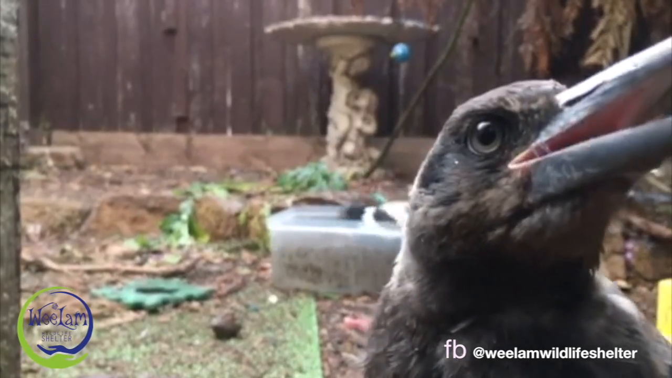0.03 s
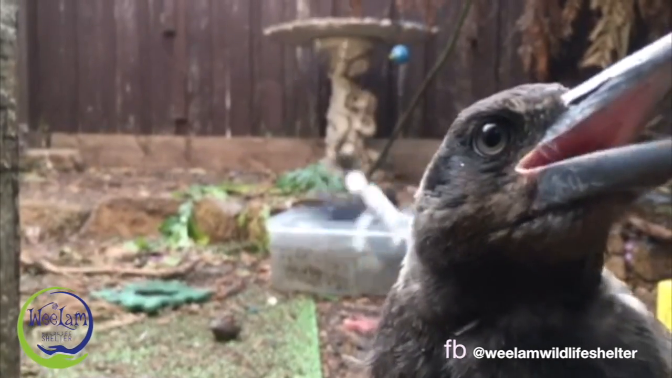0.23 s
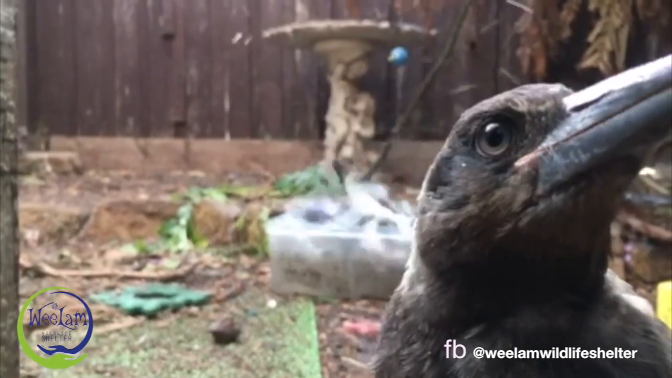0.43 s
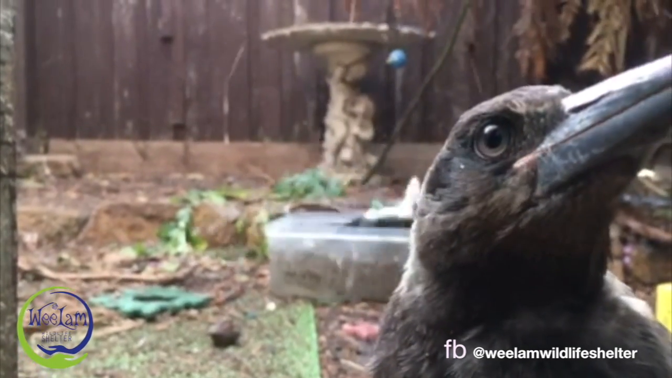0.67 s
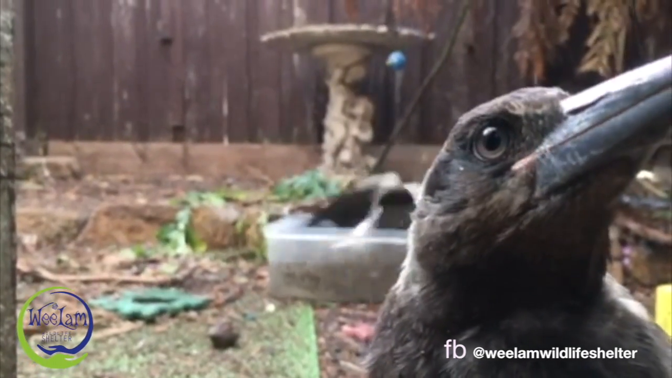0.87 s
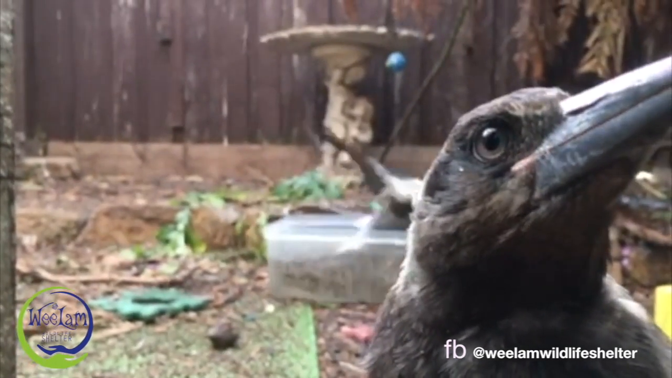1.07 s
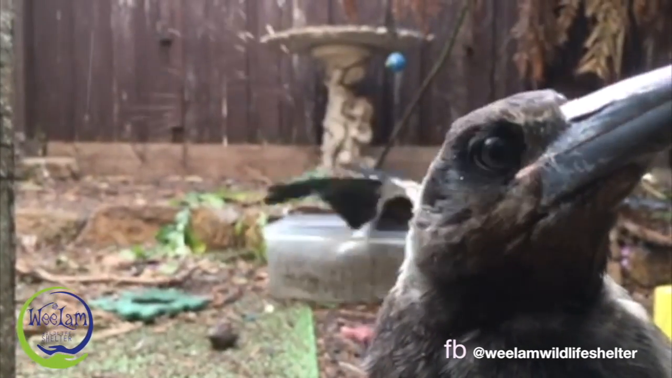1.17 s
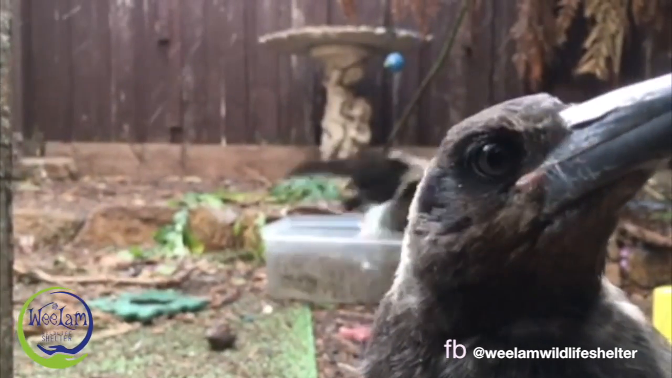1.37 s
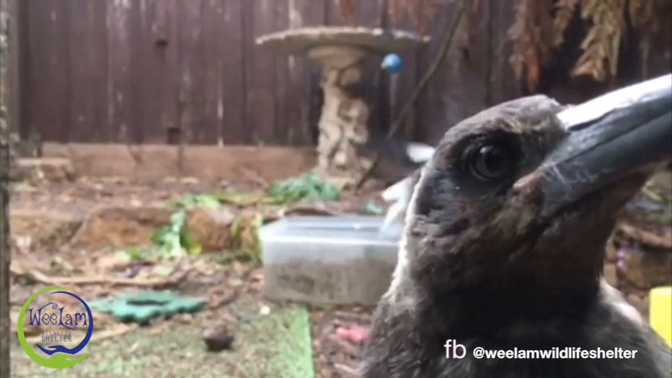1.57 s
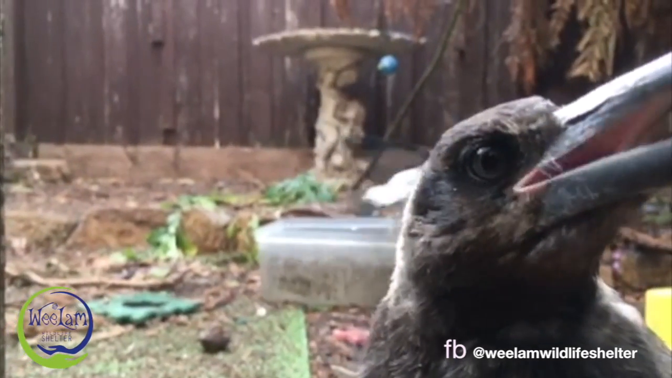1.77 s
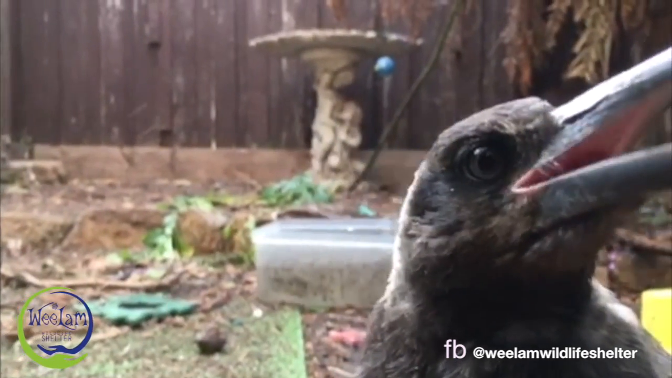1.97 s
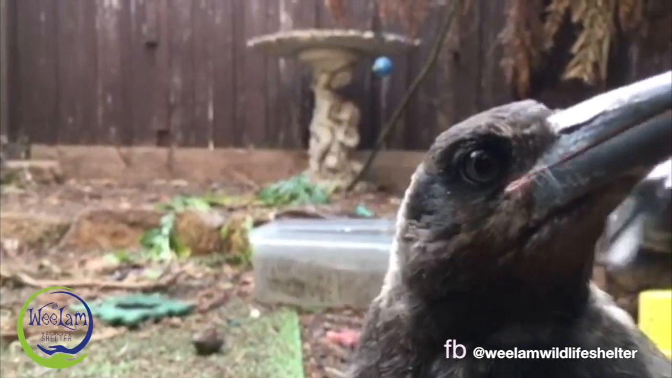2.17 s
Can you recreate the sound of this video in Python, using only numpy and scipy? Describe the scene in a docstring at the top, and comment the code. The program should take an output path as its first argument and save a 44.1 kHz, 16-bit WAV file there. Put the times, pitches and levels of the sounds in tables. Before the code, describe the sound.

Young magpie squawks close up, one clear and one raspy, while a bird splashes in a tub

```python
"""A garden with a plastic tub: a young magpie at the microphone gives a clear, arching squawk, then a lower, rasping
one that clears as it ends. Syrinx pulses ring its throat; noise bursts make its beak clicks, and soft tones low bumps.
Behind it a bird bathes: noise-burst wing slaps, rising bubble tones, spray of tiny ringing drops over mist.
Far birds whistle as wavering sines over shaped-noise rumble and air; the fence answers with a decaying noise tail."""
import sys
import numpy as np
from scipy import signal
from scipy.fft import rfft, irfft, next_fast_len
from scipy.io import wavfile
from scipy.ndimage import map_coordinates

SR = 44100
rng = np.random.default_rng(int(sys.argv[2]) if len(sys.argv) > 2 else 0)


def dump_mix(stems):
    """Bounce the given channels to the path in sys.argv[1] as a 16-bit WAV at rate SR."""
    frames = np.atleast_2d(stems).T  # one column per channel
    limited = np.clip(frames, -1, 1)  # hard clip at full scale
    pcm = np.round(limited * 32767).astype(np.int16)
    wavfile.write(sys.argv[1], SR, pcm)


N = 99225
TOP_HZ = 16000

# Spectra of outdoor rumble and air. Each row: frequency in Hz, relative level in dB.
RUMBLE_SPECTRUM = [(31, -30), (47, 0.5), (62, -12), (160, -21), (9000, -87.5)]
AIR_SPECTRUM = [(400, 0), (1200, -4), (2500, -12.5), (5000, -14), (15500, -24)]
RUMBLE_DB, AIR_DB = -52.5, -69

# Decay of the garden echo. Each row: frequency in Hz, time to -60 dB in seconds.
GARDEN_DECAY = [(2500, 0.56), (15000, .25)]
CALL_ECHO_DB, NEAR_ECHO_DB, FAR_ECHO_DB = -40, -14.5, -9.5
BEAM_HZ = 9000  # the echo send of the calls is doubled here

# Far whistles. Each row: start in seconds, length in seconds, start pitch in Hz, end pitch in Hz,
# level in dB before flicker and far mix.
WHISTLES = [(.115, 0.058, 3760, 3870, -52), (.745, .075, 3780, 3830, -53), (1.35, 0.19, 2196, 3040, -61.5),
            (1.405, .15, 3770, 3462, -58), (1.538, 0.0602, 2647, 2717, -52.5),
            (1.62, 0.228, 2665, 2787, -63)]
WHISTLE_WAVER, OCTAVE_DB = .017, -14  # waver as a fraction of pitch

# Spray envelope. Each row: time in seconds, level in dB before the drop and mist gains.
SPRAY_LEVEL = [(.425, -69), (0.464, -54), (.6, -54.5), (.66, -59), (.73, -52.5), (.82, -64.5), (.96, -61),
               (1.09, -75.5), (1.18, -62), (1.28, -84), (1.6, -77.5), (1.64, -62), (1.83, -80)]
# Mist spectrum. Each row: frequency in Hz, relative level in dB.
MIST_SPECTRUM = [(200, -12), (700, -0.5), (5500, -3.5), (15500, -12)]
DROPS_PER_S, DROP_MEDIAN_HZ, DROP_CYCLES = 850, 2697, 27  # cycles to -60 dB
DROP_SPREAD_DB = 4.6  # per unit of an exponential draw
DROPS_DB, MIST_DB = -1, -5.5

# Wing slaps on water. Each row: start in seconds, level in dB before the attack, time to -60 dB in seconds.
SLAPS = [(.433, -48.5, 0.03), (.471, -44, 0.12), (.523, -36, 0.08), (.579, -43.5, 0.11),
         (.695, -45.5, 0.02), (.727, -45, 0.03), (.905, -45, 0.09), (1.134, -52, 0.1), (1.214, -36, 0.0834)]
# Tub spectrum. Each row: frequency in Hz, relative level in dB.
TUB_SPECTRUM = [(200, -5), (400, -6), (600, 2.5), (950, 0.5), (1750, -6.5), (2300, -19.5), (16000, -39)]
# Bubbles in the tub. Each row: start in seconds, start pitch in Hz, level in dB before the envelope.
BUBBLES = [(.528, 600, -41), (.906, 640, -45), (1.44, 947, -50.5), (1.724, 3130, -47.5)]
BUBBLE_CYCLES, BUBBLE_RISE_PER_S = 57, 3  # cycles to -60 dB; rise as a fraction of start pitch

# Beak clicks. Each row: start in seconds, level in dB before the attack, time to -60 dB in seconds.
CLICKS = [(.695, -42.5, 0.05), (1.628, -26.5, 0.01), (1.6298, -31, 0.017), (2.088, -56, 0.07),
          (2.113, -48, .007)]
# Beak spectrum. Each row: frequency in Hz, relative level in dB.
BEAK_SPECTRUM = [(400, -13), (1800, -0.5), (3200, -10.5), (5800, 3.5), (7300, -10.5), (8800, -0.5),
                 (16000, -13)]
# Soft low bumps. Each row: start in seconds, pitch in Hz, level in dB before the envelope.
BUMPS = [(1.613, 261, -35), (1.615, 523, -41.5), (1.768, 429, -44.5)]
BUMP_CYCLES = 19.6  # to -60 dB

# Clear and rasping squawks. Each row: time in seconds, pitch in Hz, level of the low partials in dB,
# of the middle ones in dB, of the treble in dB, roughness from 0 to 1.
CLEAR_SQUAWK = [(.198, 1207, -55, -73.5, -85, 0.8), (.205, 1226, -33, -42, -59, 0.7),
                (.208, 1222, -20, -23, -32, 0.48), (.22, 1259, -17, -19.5, -27, 0.34),
                (.227, 1287, -18.5, -15.5, -25.5, 0.16), (.254, 1274, -23, -15, -33, 0.06),
                (.273, 1221, -27, -28.5, -56, .2), (.304, 1192, -32, -39, -65, .3),
                (.318, 1132, -41.5, -62.5, -72, .7), (.335, 1029, -58, -79, -85, 1)]
RASPING_SQUAWK = [(1.906, 798, -58, -84, -97.5, .3), (1.9105, 833, -30, -37.5, -42, .5),
                  (1.917, 823.3, -36, -44, -49, 0.99), (1.923, 834.7, -31.5, -29, -39.5, 1),
                  (1.95, 869, -28.5, -29.5, -39, .8), (1.963, 864.4, -28.5, -28, -38, .65),
                  (1.969, 843, -27.5, -34, -40, .17), (1.987, 803, -32.5, -47, -55, .2),
                  (2.0, 735, -58.5, -80, -97, 0.27)]
# Throat and beak resonances of each squawk. Each row: frequency in Hz, relative level in dB.
CLEAR_THROAT = [(600, -26), (1250, 0), (1800, -11), (2750, -20), (3700, -1), (5100, 0), (6400, -9),
                (7600, -24.5), (8900, -11), (10200, -19.5), (11600, -28), (15800, -36)]
RASPING_THROAT = [(300, -36), (600, -8.5), (830, -1.5), (1700, -1), (2100, -10), (2550, -25.5), (3100, -3),
                  (3800, -4), (4300, 3), (5000, -8), (6100, -9.5), (7600, -25), (9300, -10), (11500, -22),
                  (15500, -32)]
# Upper edges of the low, middle and lower treble bands, in Hz.
SPLIT_HZ = (2900, 7200, 9700)
TOP_FADE = 0.2  # extra dB lost above the last edge per dB of treble fall
CHOP_DB, CHOP_PER_S = 2.5, 400  # rms depth at full roughness
HISS_DB = -28.5  # relative to the low partials


def amp(db):
    """Decibels to gain."""
    return 10 ** (np.asarray(db) / 20)


def unit(x):
    """Scale to rms 1."""
    return x / np.sqrt(np.mean(x ** 2) + 1e-20)


def along(points, hz):
    """Read (Hz, value) points on a log frequency axis."""
    f, value = np.transpose(points)
    return np.interp(np.log(hz + 1), np.log(f + 1), value)


def wobble(knots_per_s, size):
    """A smooth random curve through normal draws."""
    knots = rng.standard_normal(size + 4)
    return map_coordinates(knots, [np.arange(size) * knots_per_s / SR])


def filtered(x, response):
    """Multiply the spectrum of x by a response of frequency."""
    m = next_fast_len(len(x) + 8192)
    hz = np.fft.rfftfreq(m, 1 / SR)
    return irfft(rfft(x, m) * response(hz), m)[:len(x)]


def noise(spectrum, size):
    """Coloured noise of rms 1."""
    return unit(filtered(rng.standard_normal(size), lambda hz: amp(along(spectrum, hz))))


def add(track, start_s, sound):
    """Mix a sound into a track."""
    part = track[max(0, round(start_s * SR)):][:len(sound)]
    part += sound[:len(part)]


def resonant(points, hz):
    """Causal (minimum-phase) response of a body: it rings after each pulse."""
    cepstrum = irfft(np.log(amp(along(points, hz))))
    half = len(cepstrum) // 2
    folded = np.r_[cepstrum[0], 2 * cepstrum[1:half], np.zeros(half)]
    return np.exp(rfft(folded))


def outdoors():
    """Steady low rumble and faint air, both shaped noise."""
    return amp(RUMBLE_DB) * noise(RUMBLE_SPECTRUM, N) + amp(AIR_DB) * noise(AIR_SPECTRUM, N)


def garden(x):
    """Answer of fence and ground: a noise tail in which each frequency dies at its own speed."""
    hz, t, z = signal.stft(rng.standard_normal(SR // 2), SR, nperseg=256)
    decay = np.exp(-np.log(1000) * t / along(GARDEN_DECAY, hz)[:, None])
    tail = signal.istft(z * decay, SR, nperseg=256)[1]
    return signal.fftconvolve(x, tail / np.linalg.norm(tail))[:N]


def far_birds():
    """Thin, wavering whistles with a weak octave, their level flickering quickly so that they break into
    strands."""
    out = np.zeros(N)
    for start_s, length_s, start_hz, end_hz, db in WHISTLES:
        n = int(length_s * SR)
        hz = np.linspace(start_hz, end_hz, n) * (1 + WHISTLE_WAVER * wobble(350, n))
        phase = 2 * np.pi * np.cumsum(hz) / SR
        tone = np.sin(phase) + amp(OCTAVE_DB) * np.sin(2 * phase)
        level = amp(db + 6.8 * wobble(90, n)) * np.sqrt(np.hanning(n))
        add(out, start_s, level * tone)
    return .5 * out + amp(FAR_ECHO_DB) * garden(out)


def spray():
    """Thrown water patters down as tiny, decaying sine drops over a flickering mist."""
    count = int(DROPS_PER_S * N / SR)
    when, size, pitch = rng.random((count, 3)).T
    hz = DROP_MEDIAN_HZ * np.exp(.42 * np.log(pitch / (1 - pitch)))  # logistic spread
    hz = np.clip(hz, 500, TOP_HZ)[:, None]
    n = np.arange(700)
    cycles = hz * n / SR
    size_gain = amp(DROP_SPREAD_DB * np.minimum(-np.log(size), 4))[:, None]
    drops = size_gain * np.sin(2 * np.pi * cycles) * np.exp(-np.log(1000) * cycles / DROP_CYCLES)
    places = (when * N).astype(int)[:, None] + n
    patter = np.bincount(places.ravel(), drops.ravel(), N)[:N]
    mist = amp(MIST_DB + 4 * wobble(120, N)) * noise(MIST_SPECTRUM, N)
    level_db = np.interp(np.arange(N) / SR, *np.transpose(SPRAY_LEVEL))
    return amp(level_db) * (amp(DROPS_DB) * unit(patter) + mist)


def hits(rows, spectrum, attack_s):
    """Noise bursts that rise quickly and die away in the colour of the struck thing."""
    out, t = np.zeros(N), np.arange(SR // 4) / SR
    for start_s, db, t60_s in rows:
        envelope = amp(db - 60 * t / t60_s) * (1 - np.exp(-t / attack_s))
        add(out, start_s, envelope * noise(spectrum, len(t)))
    return out


def rings(rows, life_cycles, rise_per_s):
    """Soft tones that die within so many cycles; a bubble rises in pitch as it nears the surface."""
    out, t = np.zeros(N), np.arange(SR // 4) / SR
    for start_s, hz, db in rows:
        phase = 2 * np.pi * hz * (t + rise_per_s * t * t / 2)
        decay = np.exp(-np.log(1000) * hz * t / life_cycles)
        attack = 1 - np.exp(-hz * t / 2)
        add(out, start_s, amp(db) * decay * attack * np.sin(phase))
    return out


def squawk(rows, throat, jitter_rad, shimmer, flutter_per_s, rasp_noise, spread_rad):
    """Syrinx pulses, uneven in timing and size when rough, ring the throat; air hisses at the open beak."""
    s, *cols = np.transpose(rows)
    t = np.arange(s[0], s[-1], 1 / SR)
    pitch_hz, low_db, middle_db, treble_db, rough = [np.interp(t, s, c) for c in cols]

    phase = 2 * np.pi * np.cumsum(pitch_hz) / SR
    phase = phase + jitter_rad * rough * unit(wobble(flutter_per_s, len(t)))
    partials = range(1, int(TOP_HZ / pitch_hz.min()) + 1)
    # higher partials leave the syrinx later in each cycle
    pulses = unit(sum(np.sin(k * phase - spread_rad * k * k) for k in partials))
    source = pulses * (1 + shimmer * rough * wobble(flutter_per_s, len(t)))
    source = source + rasp_noise * rough * (1 + np.cos(phase)) * rng.standard_normal(len(t))
    voice = filtered(source, lambda hz: resonant(throat, hz))

    below, upto, bright = [filtered(voice, lambda hz: 1 / (1 + (hz / edge) ** 24)) for edge in SPLIT_HZ]
    # middle and treble flicker with roughness
    chop = amp(CHOP_DB * rough * unit(wobble(CHOP_PER_S, len(t))))
    top = amp(TOP_FADE * (treble_db - treble_db.max())) * (voice - bright)
    sheen = (bright - upto + top) / np.std(voice - upto)
    hiss = filtered(rng.standard_normal(len(t)), lambda hz: amp(along(throat, hz) / 2) * (hz > SPLIT_HZ[1]))

    call = amp(low_db) * (unit(below) + amp(HISS_DB) * unit(hiss))
    call = call + amp(middle_db) * unit(chop * (upto - below))
    call = call + amp(treble_db) * chop * sheen
    out = np.zeros(N)
    add(out, s[0], call)
    return out


def scene():
    """The near bird is almost dry, its beak beaming treble into the garden; the bath carries more echo."""
    bath = hits(SLAPS, TUB_SPECTRUM, attack_s=.0019) + rings(BUBBLES, BUBBLE_CYCLES, BUBBLE_RISE_PER_S) + spray()
    close = hits(CLICKS, BEAK_SPECTRUM, attack_s=.0002) + rings(BUMPS, BUMP_CYCLES, rise_per_s=0)
    calls = squawk(CLEAR_SQUAWK, CLEAR_THROAT, jitter_rad=.13, shimmer=.18, flutter_per_s=900,
                   rasp_noise=.3, spread_rad=.12)
    calls = calls + squawk(RASPING_SQUAWK, RASPING_THROAT, jitter_rad=.34, shimmer=.22, flutter_per_s=700,
                           rasp_noise=.27, spread_rad=.19)
    beamed = filtered(calls, lambda hz: 1 + (hz / BEAM_HZ) ** 2)
    echo = garden(amp(CALL_ECHO_DB) * beamed + amp(NEAR_ECHO_DB) * (bath + close))
    return (outdoors() + far_birds() + echo + bath + close + calls)[None]


def record(dry):
    """The microphone keeps nothing above its band limit."""
    return np.array([filtered(x, lambda hz: hz < TOP_HZ) for x in dry])


dry = scene()
out = record(dry)
dump_mix(out)
```